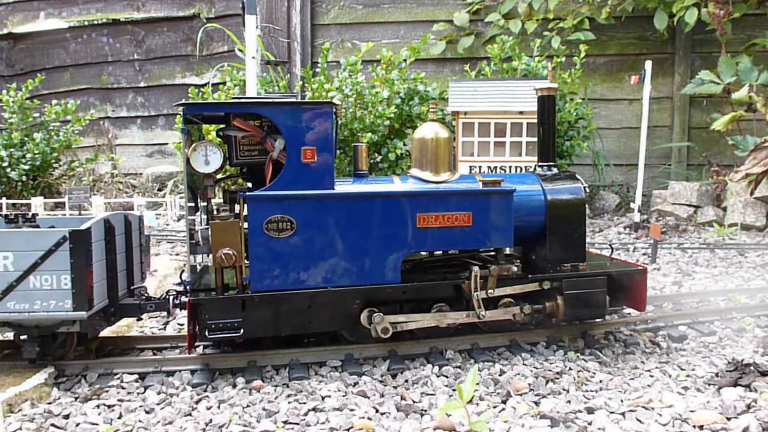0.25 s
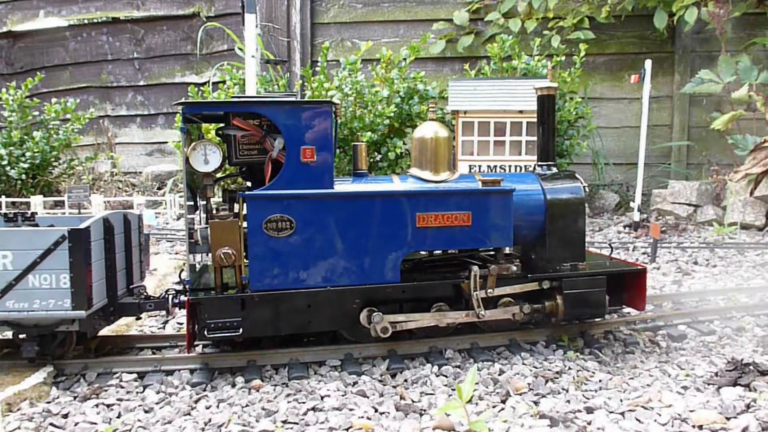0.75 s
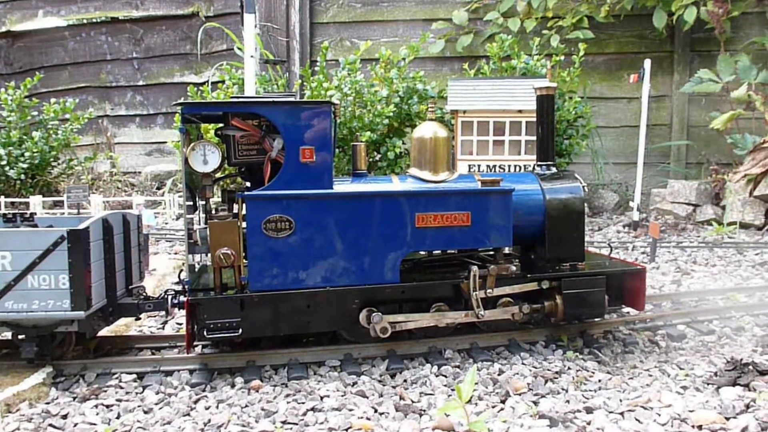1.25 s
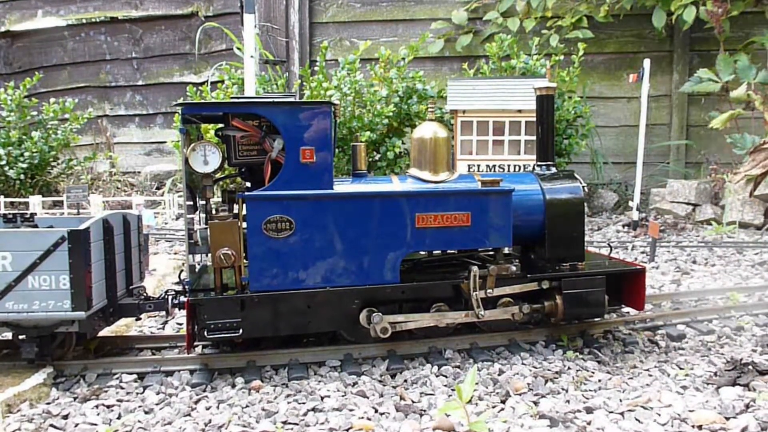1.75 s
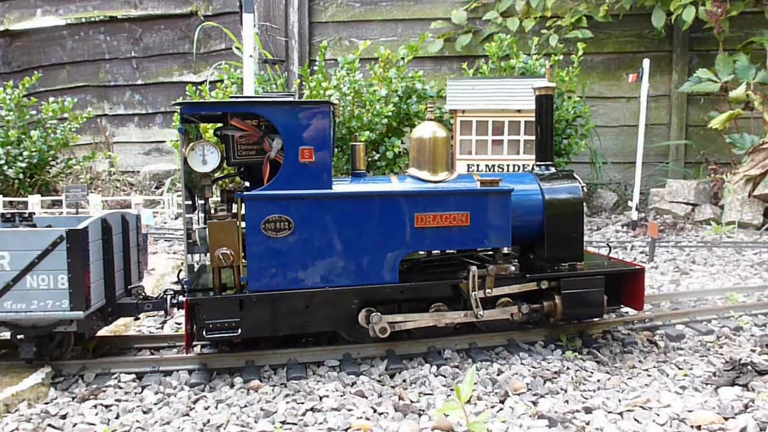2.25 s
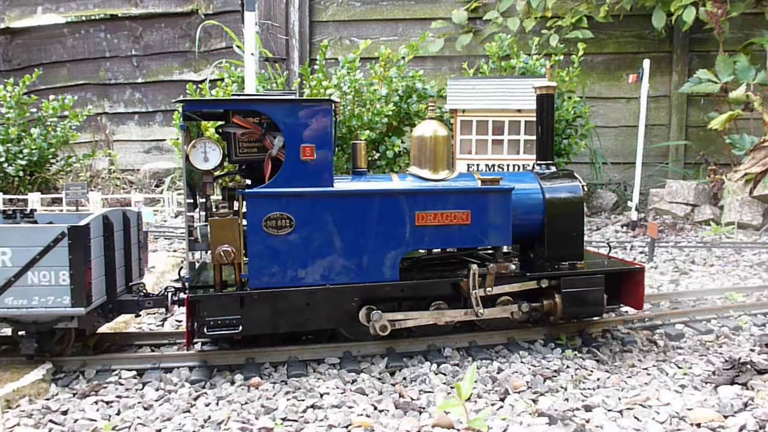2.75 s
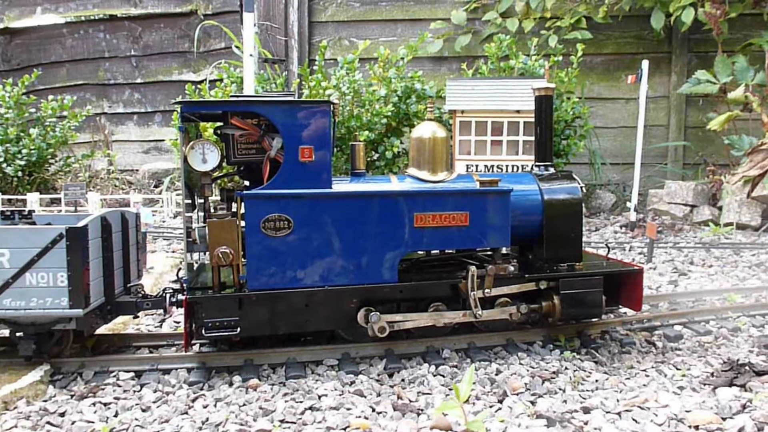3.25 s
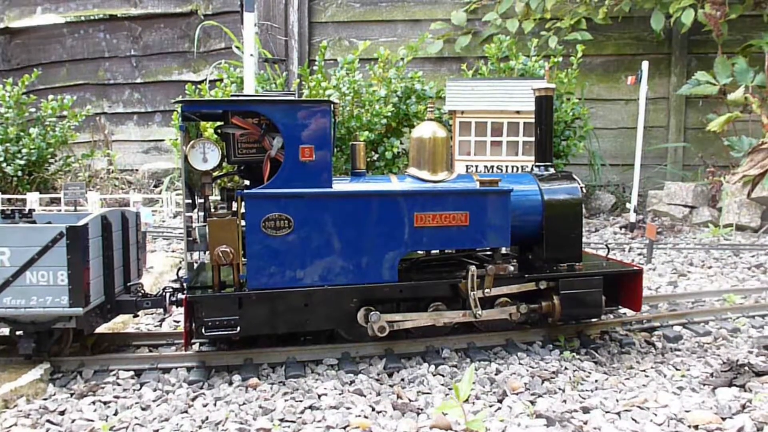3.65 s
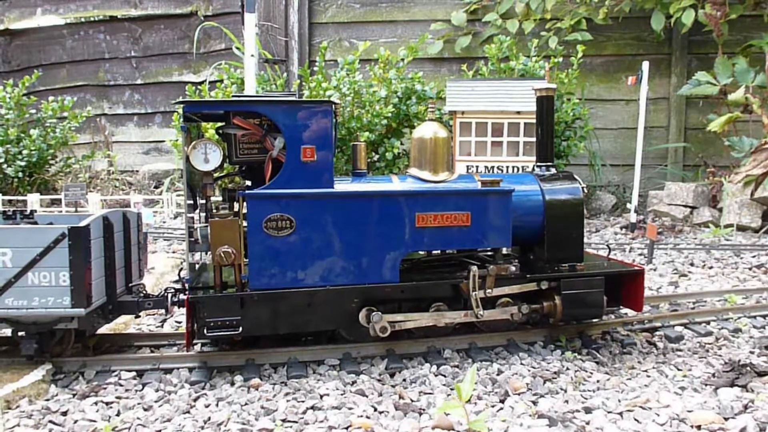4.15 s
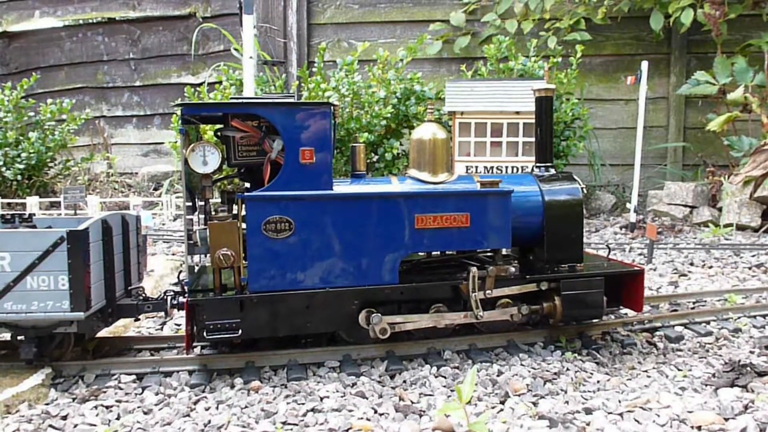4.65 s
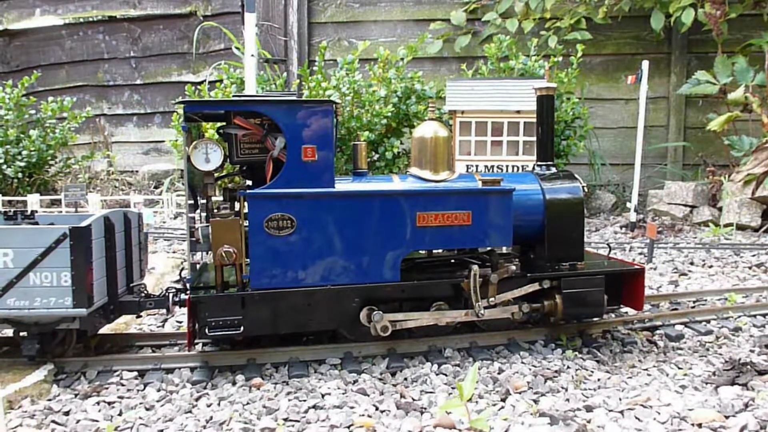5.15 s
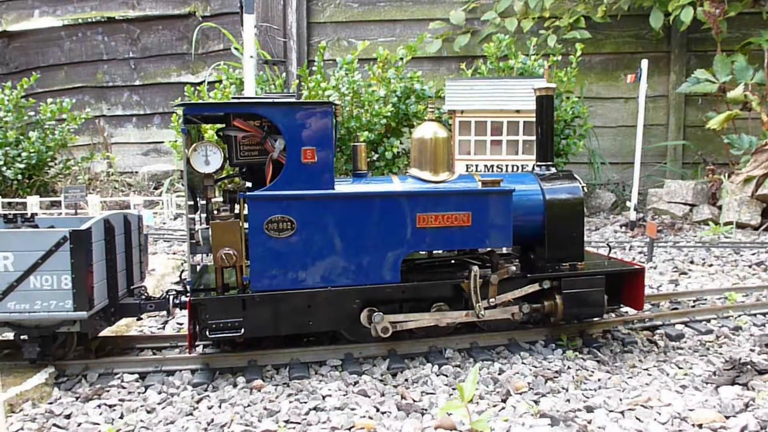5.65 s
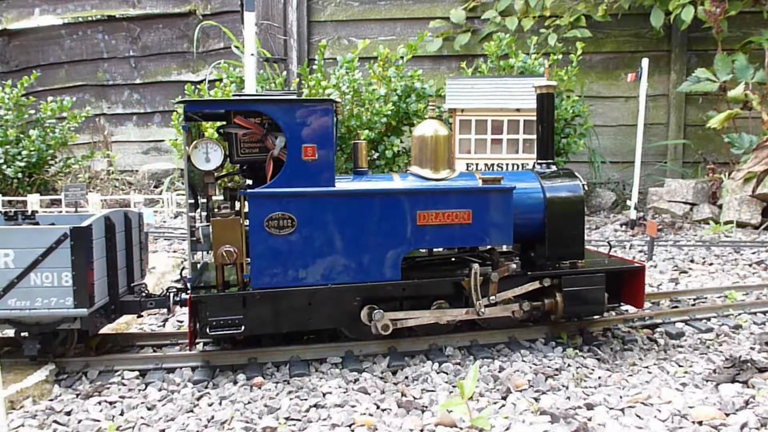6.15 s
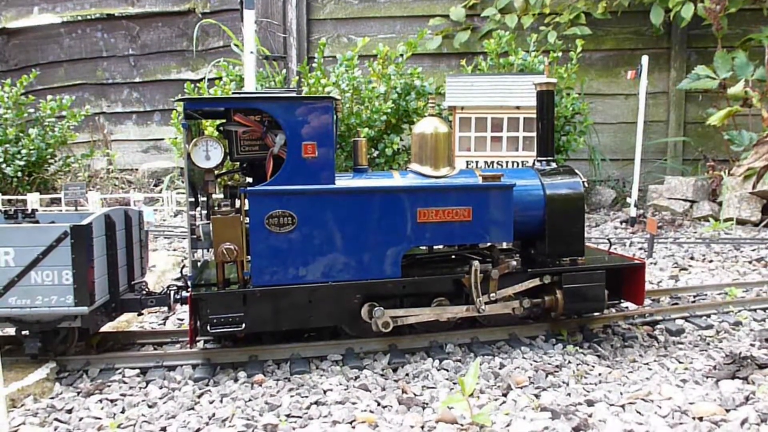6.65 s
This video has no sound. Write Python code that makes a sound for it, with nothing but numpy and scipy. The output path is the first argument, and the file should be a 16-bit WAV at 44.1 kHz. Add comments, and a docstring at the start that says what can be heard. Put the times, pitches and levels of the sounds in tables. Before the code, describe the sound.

A miniature steam engine's whistle shrieks breathily, drops to a lower fluttering note, breaks up and snaps shut, leaving burner roar, hiss and spitting water.

```python
"""Model steam whistle in a garden

A small live-steam model locomotive stands close to the microphone, over faint air rumble and hum.
Steam plays its whistle: overblown and breathy, then a lower, fluttering note, then broken up and shut.
Filtered noise makes the burner's roar, steam hiss and leak; a noise-shaken resonance breaks up the note.
Pulses make the spits of hot water; struck modes make the engine's knocks and ticks; squeaks are sines.
The camera's gain control ducks everything while the sound is loud or shrill."""
import sys
import numpy as np
from scipy import signal
from scipy.fft import rfft, irfft, next_fast_len
from scipy.io import wavfile
from scipy.ndimage import uniform_filter1d

SR = 44100
rng = np.random.default_rng(int(sys.argv[2]) if len(sys.argv) > 2 else 0)


def master(y):
    """Save y as 16-bit WAV."""
    cut = np.clip(np.atleast_2d(y).T, -1, 1)
    pcm = np.round(cut * 32767)  # scale
    wavfile.write(sys.argv[1], SR, pcm.astype(np.int16))


N = 304290
TIME = np.arange(N) / SR  # seconds
SHUT_S = 3.006  # the whistle's valve starts to shut


def undb(db):
    """Decibels to gain."""
    return np.exp(np.asarray(db) * (np.log(10) / 20))


def curve(points):
    """Join (time_s, value) rows by straight lines."""
    return np.interp(TIME, *np.transpose(points))


def unit(x):
    """Scale to rms 1."""
    return x / np.sqrt(np.mean(np.abs(x) ** 2))


def unit_peak(x):
    """Scale to peak 1."""
    return x / np.abs(x).max()


def gains(colour, size):
    """Gain of (frequency_hz, level_db) points on an FFT grid, joined along log frequency."""
    hz, db = np.transpose(colour)
    grid = np.maximum(np.fft.rfftfreq(size, 1 / SR), 1)
    return undb(np.interp(np.log(grid), np.log(hz), db))


def hiss(colour):
    """Turbulence: white noise filtered to a given colour, rms 1."""
    size = next_fast_len(N, True)
    spectrum = rfft(rng.standard_normal(size)) * gains(colour, size)
    return unit(irfft(spectrum, size)[:N])


def walk(rate_hz):
    """Random levels, each held 1 / rate_hz seconds, smoothed twice and scaled to rms 1."""
    hold = max(int(SR / rate_hz), 2)
    steps = np.repeat(rng.standard_normal(N // hold + 1), hold)
    smooth = uniform_filter1d(uniform_filter1d(steps, hold), hold)
    return unit(smooth[:N])


def wander(width_hz, skirt_hz, size=8):
    """Complex envelope of a resonance shaken by turbulence, computed every size samples."""
    coarse = TIME[::size]
    envelope = rng.standard_normal(len(coarse)) + 1j * rng.standard_normal(len(coarse))
    for hz in (width_hz / 2, skirt_hz):
        pole = np.exp(-2 * np.pi * hz * size / SR)
        envelope = signal.lfilter([1], [1, -pole], envelope)
    return np.interp(TIME, coarse, unit(envelope))


def click(colour, size=512):
    """Pulse of a given colour and peak 1, made causal by folding its cepstrum."""
    cepstrum = irfft(np.log(gains(colour, size)))
    cepstrum[1:size // 2] *= 2
    cepstrum[size // 2 + 1:] = 0
    return unit_peak(irfft(np.exp(rfft(cepstrum))))


def strike(modes, start_s, peak_db, contact_s, size=8192):
    """Modes rung by one blow; a longer contact gives less treble."""
    age = TIME[:size]
    push = 1 - np.exp(-age / contact_s)
    ring = 0
    for hz, level_db, t60_s in modes:
        decay = np.exp(-np.log(1000) * age / t60_s)
        ring = ring + undb(level_db) * np.sin(2 * np.pi * hz * age) * decay
    blow = undb(peak_db) * unit_peak(push * ring)
    return np.pad(blow, (int(start_s * SR), N))[:N]


def background():
    """Low rumble of the open garden air with a faint, wavering hum."""
    # rumble: frequency_hz, level_db
    air_colour = [(25, -11.5), (50, -1.5), (140, 0.5), (300, -3.5), (1000, -23.5), (7000, -40)]
    air_db, hum_hz, hum_db = -54.5, 193.2, -52  # rms levels
    carrier = np.exp(2j * np.pi * hum_hz * TIME)
    hum = np.sqrt(2) * np.real(wander(width_hz=5.2, skirt_hz=14) * carrier)
    return hiss(air_colour) * undb(air_db) + hum * undb(hum_db)


def squeaks():
    """Brief thin tones that waver in pitch, swell and fade."""
    # faint squeaks: centre_s, length_s, pitch_hz, peak_db
    squeak_rows = [(3.664, 0.018, 1840, -43), (5.003, .075, 1680, -39.5)]
    out, waver = 0, 1 + 0.013 * walk(60)
    for centre_s, length_s, hz, db in squeak_rows:
        swell = np.cos(np.pi * np.clip((TIME - centre_s) / length_s, -.5, .5))
        phase = 2 * np.pi * np.cumsum(hz * waver) / SR
        out = out + undb(db) * swell * np.sin(phase)
    return out


def metal_ticks():
    """Small ticks of hot metal, each ringing a few high modes."""
    # ticks: start_s, peak_db
    tick_rows = [(5.833, -39), (5.996, -36.5), (6.236, -28.5), (6.345, -38), (6.423, -38), (6.504, -39),
                 (6.736, -29.5)]
    # what a tick rings with: frequency_hz, relative_level_db, t60_s
    tick_modes = [(2830, 5, 0.02), (3110, -3, 0.026), (4000, -4.5, 0.024), (4750, -8, 0.022)]
    return sum(strike(tick_modes, start_s, db, contact_s=0.00048) for start_s, db in tick_rows)


def engine_knocks():
    """Metal rings to a few knocks as the engine is about to move and takes up the strain."""
    # knocks: start_s, peak_db, share of the free ring time (0-1)
    knock_rows = [(3.2856, -15.5, 0.46), (3.3355, -10, 0.93), (3.641, -18, 0.22)]
    # what the engine rings with: frequency_hz, relative_level_db, free_t60_s
    knock_modes = [(654, -29, 0.012), (908, 5.5, 0.028), (1150, 3, 0.019), (1610, 4.5, 0.016),
                   (2530, -21.5, 0.011), (3170, 0, 0.015), (3550, -23, 0.0098), (5140, -11.5, 0.027)]
    out = 0
    for start_s, peak_db, share in knock_rows:
        damped = [(hz, level_db, t60_s * share) for hz, level_db, t60_s in knock_modes]
        out = out + strike(damped, start_s, peak_db, contact_s=0.00027)
    return out


def leak(valve):
    """Steam sputters out as the whistle shuts, swells, then drops back to a trickle."""
    # leak hiss: frequency_hz, level_db
    leak_colour = [(1120, -38), (1900, -5.5), (2090, -8), (2350, 2), (2630, -13), (2890, 0), (3430, -6),
                   (4310, -1), (4670, -4.5), (5030, -3.5), (5380, -8), (6200, -16), (7400, -32.5),
                   (9620, -60)]
    start_db, swell_db_per_s, drop_s, trickle_db = -51, 3.5, 5.49, -50.5
    swelling_db = start_db + swell_db_per_s * (TIME - SHUT_S)
    dropped = np.clip((TIME - drop_s) / .02, 0, 1)
    level_db = swelling_db + (trickle_db - swelling_db) * dropped
    sputter_db = 1.2 * walk(300) + 0.72 * walk(15)
    return hiss(leak_colour) * undb(level_db + sputter_db) * (1 - valve)


def spitting(fire, rate_hz=90, spread_db=4.5, size_db=1.7, limit_db=9):
    """Hot water bursts in tiny random pops that follow the fire, plus a few loud spits."""
    # louder spits: start_s, peak_db
    spit_rows = [(3.070, -19.5), (3.140, -19), (3.170, -22), (3.316, -20), (3.551, -23), (4.025, -19),
                 (4.877, -19.5), (5.108, -16.5), (5.133, -20), (5.439, -19), (5.544, -19.5), (5.984, -20),
                 (5.996, -20), (6.238, -25), (6.685, -20), (6.737, -24)]
    # colour of a spit: frequency_hz, level_db
    spit_colour = [(100, -22), (450, -4.5), (950, -2), (1400, -2), (1950, -13.5), (3000, -17), (5000, -27),
                   (6500, -26.5), (7600, -39.5)]
    happens = rng.random(N) < rate_hz / SR
    sizes = undb(size_db + np.minimum(spread_db * rng.exponential(size=N), limit_db))
    pops = happens * sizes * fire
    for start_s, db in spit_rows:
        pops[int(start_s * SR)] += undb(db)
    return signal.fftconvolve(pops, click(spit_colour))[:N]


def fire_level():
    """Gain of the burner over time; it also scales the small pops of water."""
    # burner: time_s, gain_db
    fire_points = [(0, -37), (1.4, -34), (2.6, -36), (3.15, -38.5), (3.5, -37), (4.8, -34.5), (6.9, -33)]
    return undb(curve(fire_points))


def burner(fire):
    """The flame roars and keeps the flue's resonances ringing."""
    # broad roar of the flame: frequency_hz, level_db
    roar_colour = [(25, -13.5), (50, -7), (110, -5.5), (170, 0), (320, -2), (600, -1), (850, -1),
                   (1200, -1.5), (1500, -11.5), (1900, -22.5), (3000, -14.5), (7000, -42)]
    # resonances of flue and chimney: frequency_hz, width_hz, level_db relative to the fire
    flue_rows = [(85, 6.3, -22.5), (200.2, 11, -16), (809.7, 70, -9), (912.5, 52, 0.4)]
    roar = hiss(roar_colour) * undb(-4 + 0.45 * walk(50))
    for hz, width_hz, db in flue_rows:
        ring = wander(width_hz=width_hz, skirt_hz=2.8 * width_hz)
        tone = np.real(ring * np.exp(2j * np.pi * hz * TIME))
        roar = roar + np.sqrt(2) * undb(db) * tone
    return roar * fire


def steam_state():
    """Pitch rise, overblowing and valve gain (each 0-1) from the pressure at the whistle."""
    # steam: time_s, pressure (0 = just sounding, 1 = highest note, more = overblown)
    pressure_points = [(0, 1.2), (.7, 1.206), (.8, .95), (.86, 0.69), (.99, 0.086), (1.5, 0.15), (2.45, .1),
                       (2.55, 0.045), (2.69, 0.062), (2.787, .78), (2.815, 1.15), (2.98, 1.42), (3.0, 0.55),
                       (3.015, 0)]
    break_pressure, break_range = 0.75, .52  # the note starts to break up; how much higher it is overblown
    shut_db_per_s = 1147  # how fast the whistle dies
    pressure = curve(pressure_points)
    overblown = np.clip((pressure - break_pressure) / break_range, 0, 1)
    valve = undb(-shut_db_per_s * np.maximum(TIME - SHUT_S, 0))
    return np.minimum(pressure, 1), overblown, valve


def jet(overblown, valve):
    """Steam hisses and shrieks over the whistle's lip; engine and ground return it a moment later."""
    # jet hiss: frequency_hz, level_db
    jet_colour = [(300, -6.5), (1000, 0.5), (1350, 3), (1800, -1), (2200, 4), (2750, 9.5), (3100, 0),
                  (3800, -1), (4550, -3), (5030, 6), (5330, 0.5), (5650, 3), (6600, -13.5), (7500, -23)]
    # shriek: frequency_hz, level_db
    shriek_colour = [(5500, -17), (5950, -1.5), (6250, 1.5), (6550, -4), (6850, -10), (7200, -11.5),
                     (7600, -26.5)]
    # nearby surfaces: delay_s, reflection factor
    echo_rows = [(.00142, .17), (.002785, .16), (.00333, .13), (.0075, -.13)]
    # levels when singing, and gains when overblown
    jet_db, jet_overblown_db = -33.8, 6.5
    shriek_db, shriek_overblown_db = -42.5, 12
    rush = hiss(jet_colour) * undb(jet_db + jet_overblown_db * overblown + 0.98 * walk(60))
    shriek = hiss(shriek_colour) * undb(shriek_db + shriek_overblown_db * overblown + 0.89 * walk(47))
    steam = (rush + shriek) * valve
    echoes = sum(share * np.interp(TIME - delay_s, TIME, steam, left=0) for delay_s, share in echo_rows)
    return steam + echoes


def surges():
    """Wet steam makes the note surge or choke: smooth bumps in level (dB) and pitch (Hz)."""
    # surges: centre_s, half_length_s, level_change_db, pitch_change_hz
    surge_rows = [(0.046, 0.0092, 9.5, -1), (0.139, 0.014, 4.5, -1.5), (0.266, 0.022, 6, 2.5),
                  (0.653, .015, 7.5, -0.5), (0.896, 0.13, 8.5, -1.5), (1.273, 0.012, -15, 3),
                  (1.442, 0.0091, -15.5, 2), (1.638, 0.048, 3.5, 43.5), (1.782, 0.019, -13, -31),
                  (1.876, 0.068, 5, 32), (1.949, 0.1, 4, -11), (2.055, .045, 9.5, -28.5),
                  (2.148, 0.062, 5.5, 10), (2.395, .02, -5, 2.5)]
    level_db, pitch_hz = 0, 0
    for centre_s, half_length_s, db, hz in surge_rows:
        bump = np.cos(np.pi / 2 * np.clip((TIME - centre_s) / half_length_s, -1, 1)) ** 2
        level_db = level_db + db * bump
        pitch_hz = pitch_hz + hz * bump
    return level_db, pitch_hz


def whistle(rise, overblown, valve):
    """The bell sings a near sine when the jet locks to it, and mostly rings with noise when overblown."""
    note_hz, rise_hz = 2283.4, 224  # pitch at pressure 0, and its rise up to pressure 1
    note_db, rise_db, overblown_db = -17, 6.5, -19.5
    warming_db_per_s = 1  # the note grows as the bell warms
    singing_lock, overblown_lock = 0.93, 0.31  # share of power in the clean note (0-1)
    surge_db, surge_hz = surges()
    # the clean note steadies as the pressure rises, until it breaks up
    steady = singing_lock + (1 - singing_lock) * rise
    lock = np.clip(steady + (overblown_lock - steady) * overblown, 0, 1)
    tremble = 1 + 0.0043 * walk(70) + .003 * walk(25)  # from wet steam
    hz = (note_hz + rise_hz * rise + surge_hz) * tremble
    phase = 2 * np.pi * np.cumsum(hz) / SR
    flutter = unit(undb(1.68 * walk(70) + 1.2 * walk(190)))
    note = np.sqrt(lock) * flutter
    ring = np.sqrt(1 - lock) * wander(width_hz=100, skirt_hz=234)
    singing_db = note_db + rise_db * rise + warming_db_per_s * TIME
    level_db = singing_db + (overblown_db - singing_db) * overblown + surge_db
    swing = np.sqrt(2) * (note + ring) * undb(level_db)
    octave = undb(-30.5) * rise * lock * np.abs(swing) * np.cos(2 * phase)
    return (np.real(swing * np.exp(1j * phase)) + octave) * valve


def scene():
    """The engine's sounds over the garden's quiet background."""
    fire = fire_level()
    rise, overblown, valve = steam_state()
    quiet = background() + squeaks() + metal_ticks() + engine_knocks()
    boiler = leak(valve) + spitting(fire) + burner(fire)
    blast = jet(overblown, valve) + whistle(rise, overblown, valve)
    return (quiet + boiler + blast)[None]


def follow(x, attack_s, release_s, size=32):
    """Envelope that rises fast and falls slowly, updated once a block."""
    out, envelope = [], 0.
    for value in x[::size].tolist():
        time_s = attack_s if value > envelope else release_s
        envelope += (value - envelope) * min(size / SR / time_s, 1)
        out.append(envelope)
    return np.interp(TIME, TIME[::size], out)


def gain_control(x):
    """Turns the sound down while it is loud, above all when it is shrill."""
    threshold_db, ratio, attack_s, release_s = -16.5, 5.27, 0.002, 0.12
    sense_hz, sense_db = 5230, 23.5  # treble above sense_hz counts this much more
    treble_filter = signal.butter(4, sense_hz, "highpass", fs=SR, output="sos")
    treble = signal.sosfilt(treble_filter, x)
    power = uniform_filter1d(x ** 2 + (undb(sense_db) * treble) ** 2, size=256)
    excess_db = np.maximum(10 * np.log10(np.abs(power) + 1e-12) - threshold_db, 0)
    cut_db = (1 - 1 / ratio) * follow(excess_db, attack_s, release_s)
    return x * undb(-cut_db)


def record(dry):
    """A small camera's microphone with gain control and a narrow audio band, 42 to 7550 Hz."""
    low_cut = signal.butter(2, 42, "highpass", fs=SR, output="sos")
    high_cut = signal.ellip(10, .2, 80, 7550, fs=SR, output="sos")
    thin = signal.sosfilt(low_cut, gain_control(dry[0]))
    return signal.sosfilt(high_cut, thin)[None]


dry = scene()
out = record(dry)
master(out)
```